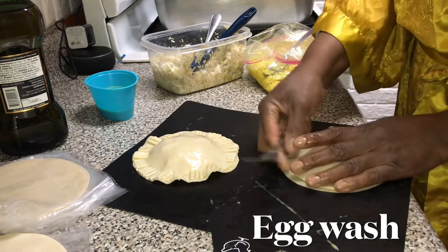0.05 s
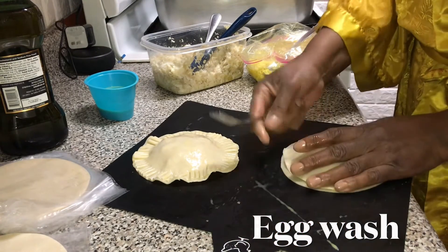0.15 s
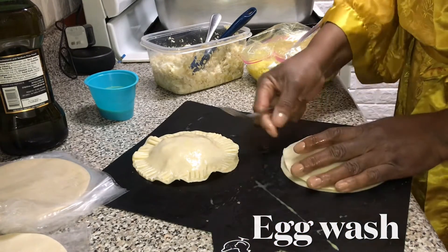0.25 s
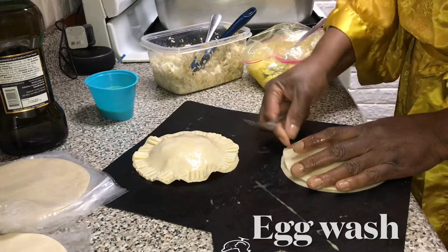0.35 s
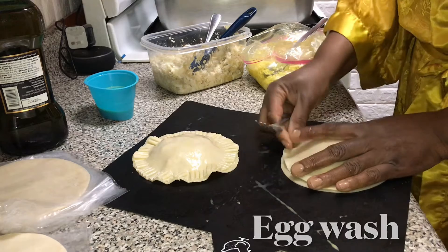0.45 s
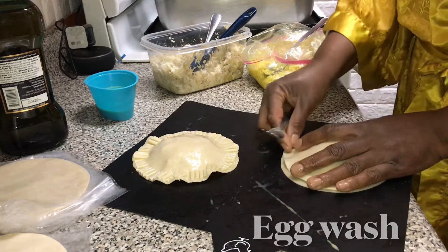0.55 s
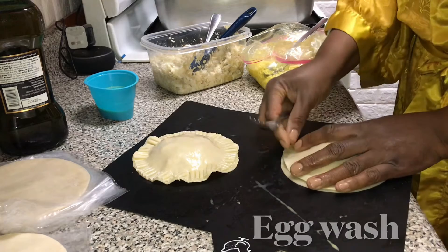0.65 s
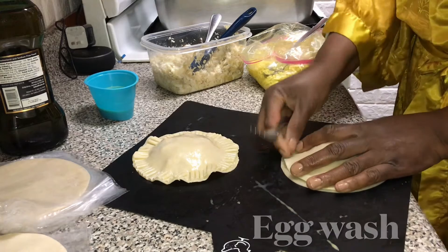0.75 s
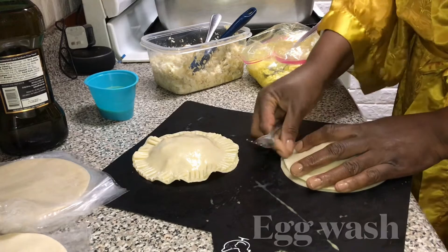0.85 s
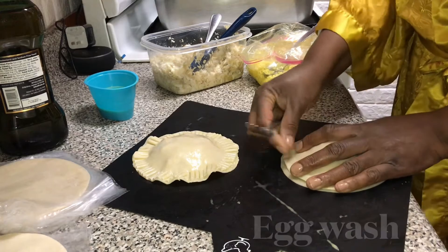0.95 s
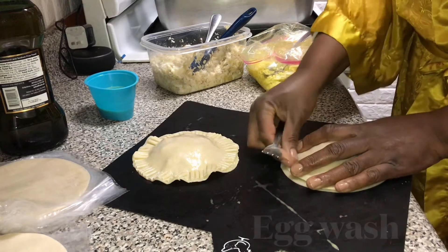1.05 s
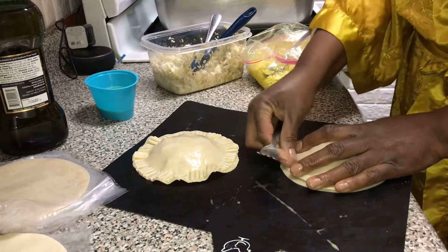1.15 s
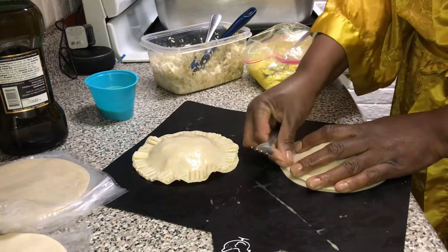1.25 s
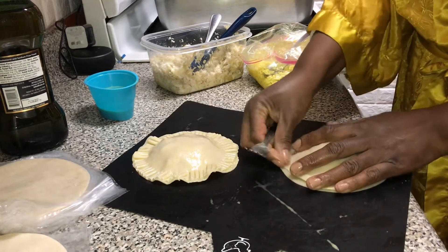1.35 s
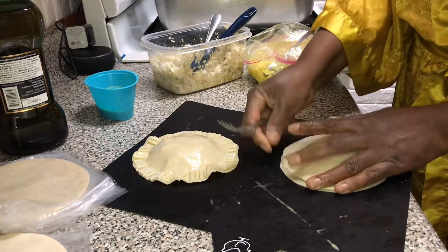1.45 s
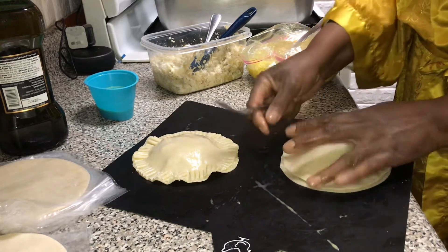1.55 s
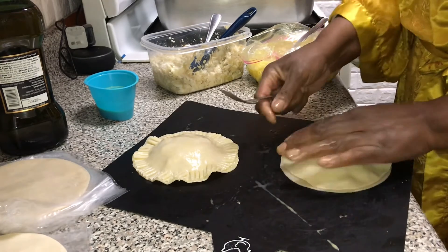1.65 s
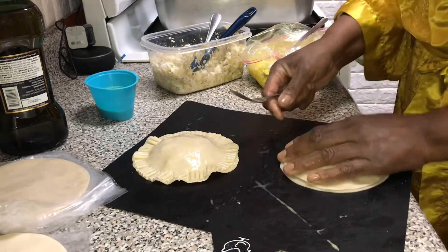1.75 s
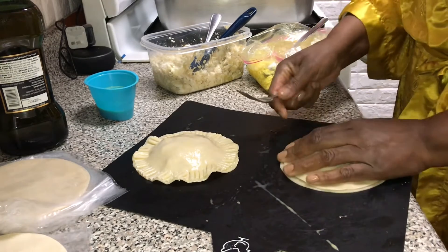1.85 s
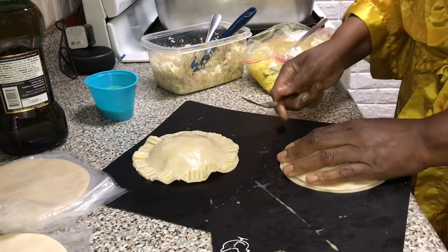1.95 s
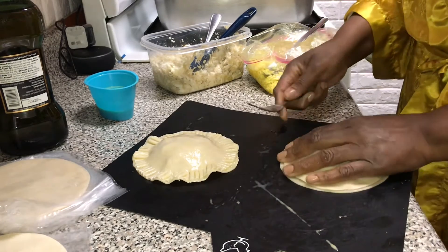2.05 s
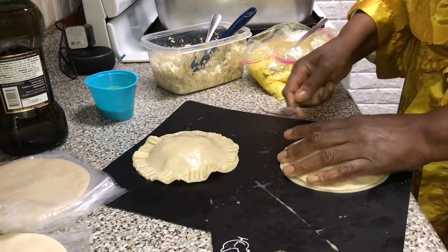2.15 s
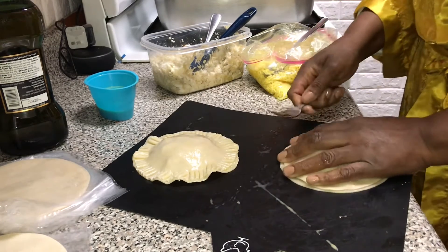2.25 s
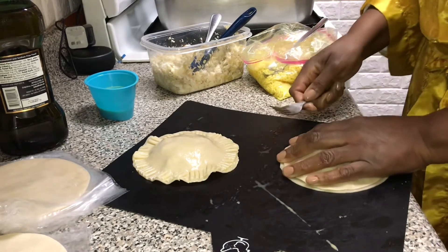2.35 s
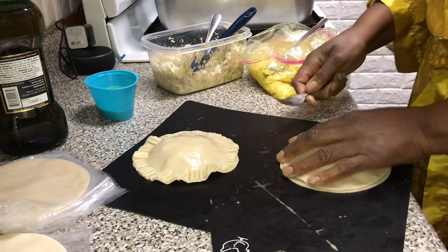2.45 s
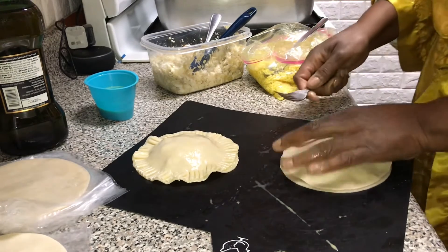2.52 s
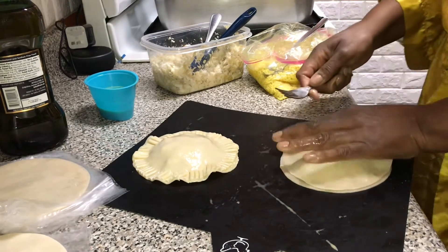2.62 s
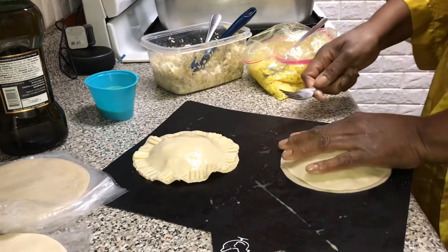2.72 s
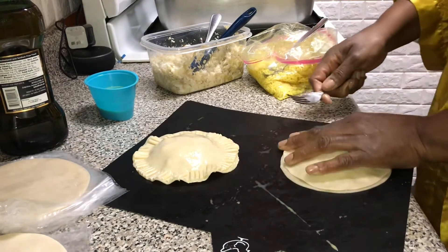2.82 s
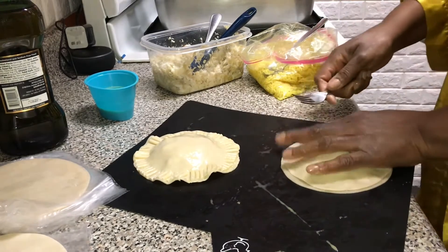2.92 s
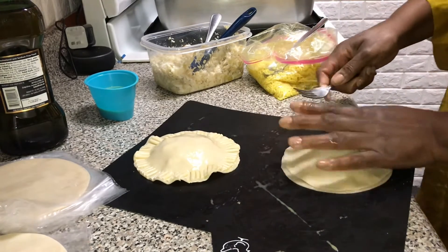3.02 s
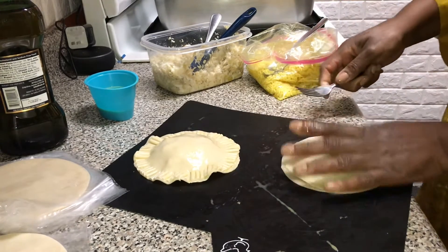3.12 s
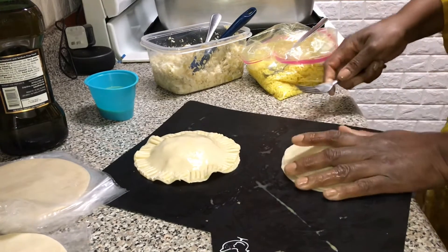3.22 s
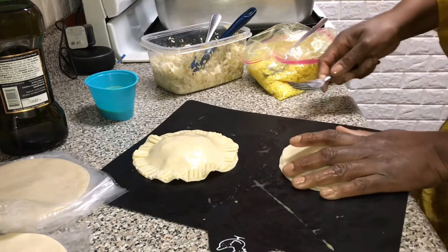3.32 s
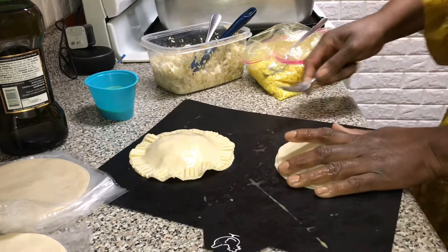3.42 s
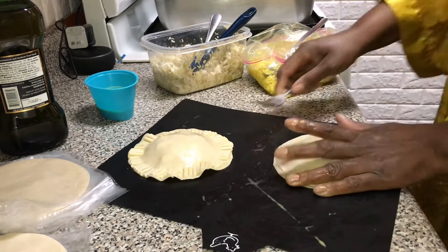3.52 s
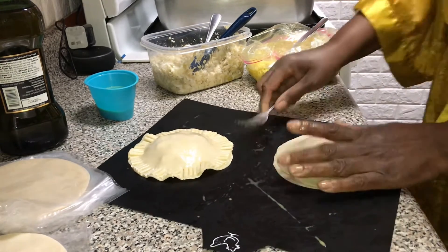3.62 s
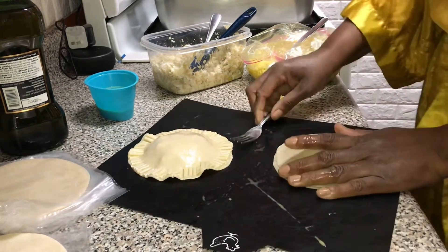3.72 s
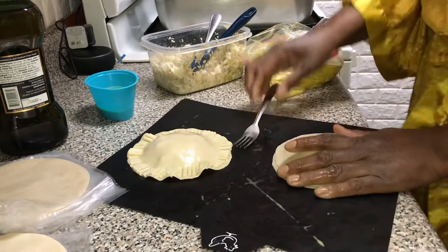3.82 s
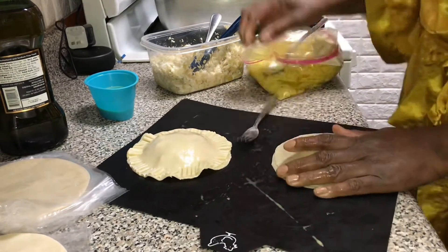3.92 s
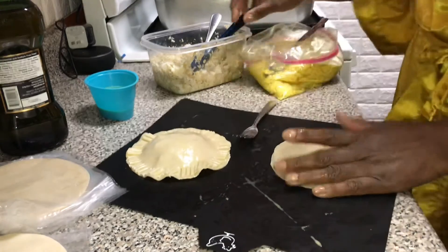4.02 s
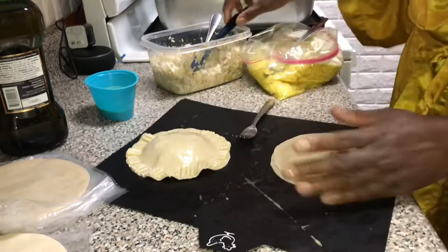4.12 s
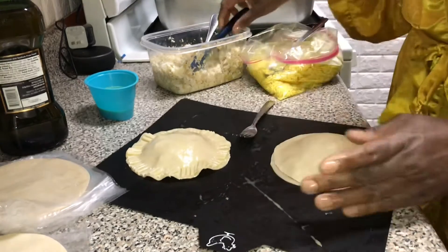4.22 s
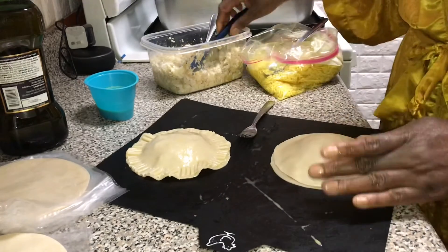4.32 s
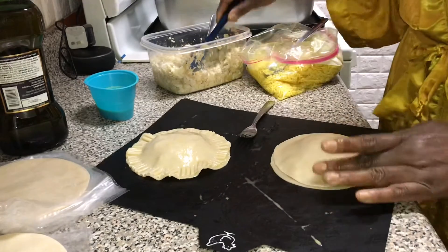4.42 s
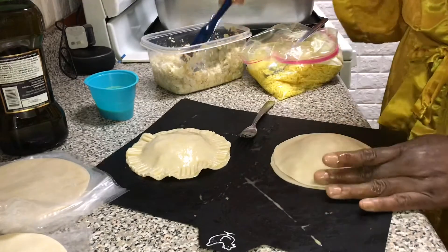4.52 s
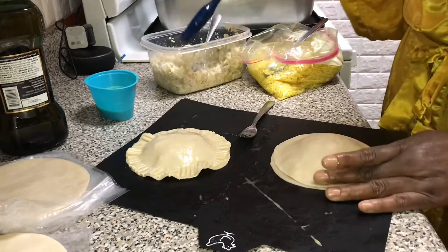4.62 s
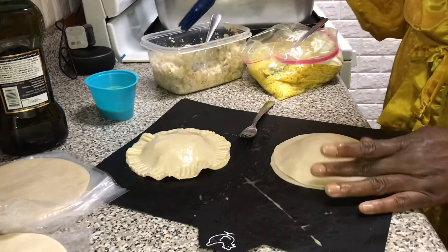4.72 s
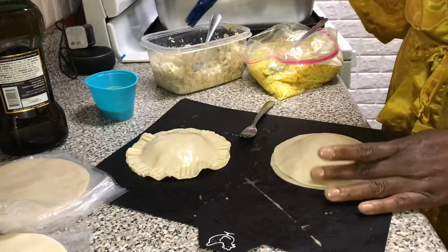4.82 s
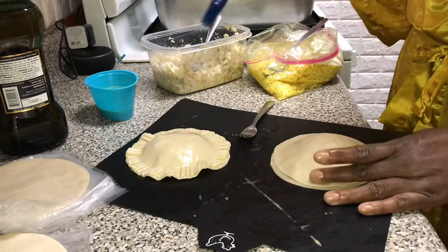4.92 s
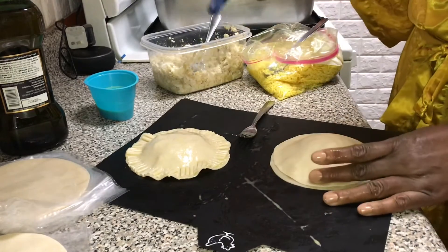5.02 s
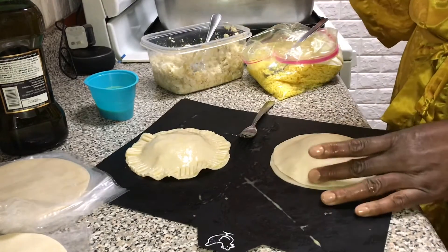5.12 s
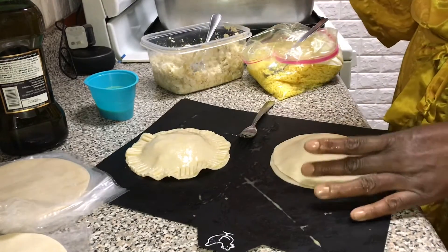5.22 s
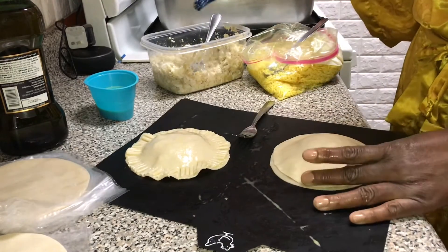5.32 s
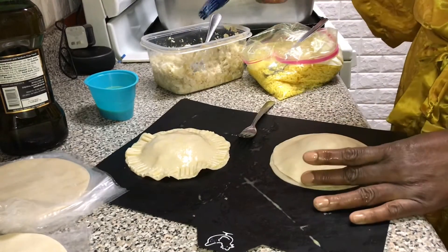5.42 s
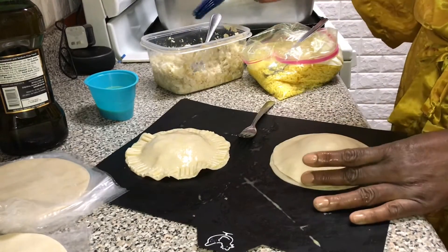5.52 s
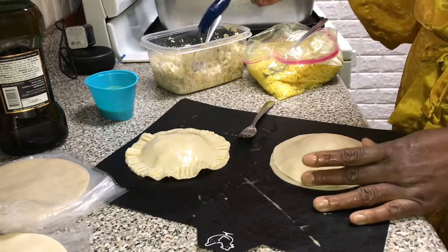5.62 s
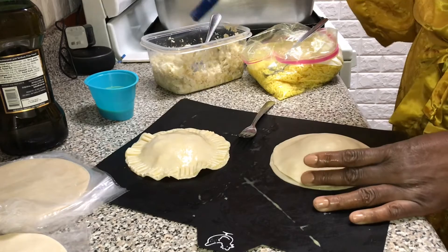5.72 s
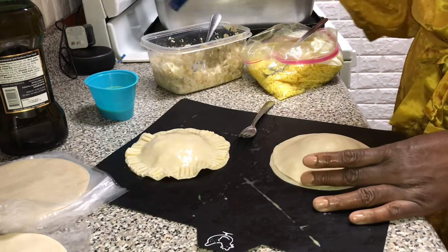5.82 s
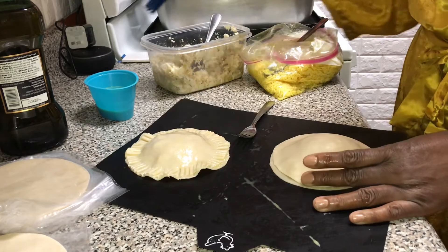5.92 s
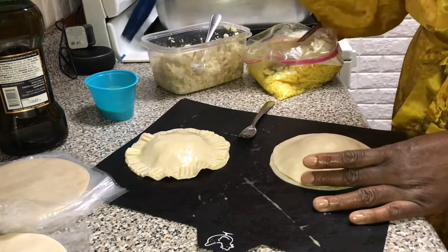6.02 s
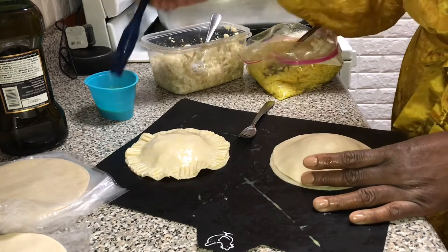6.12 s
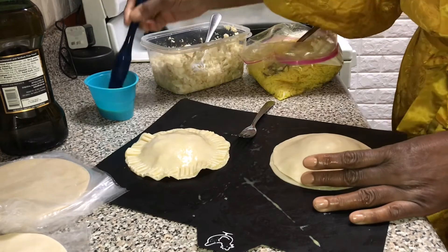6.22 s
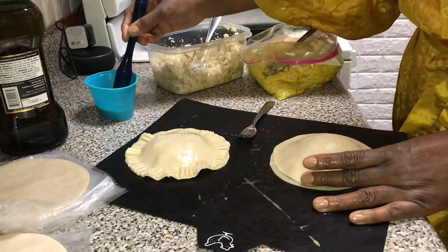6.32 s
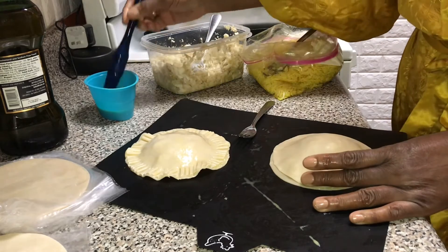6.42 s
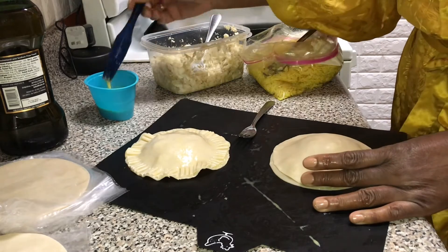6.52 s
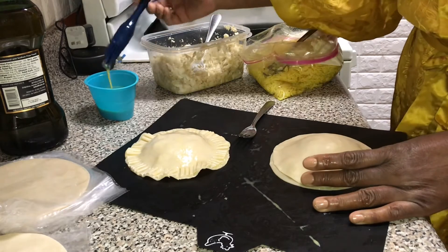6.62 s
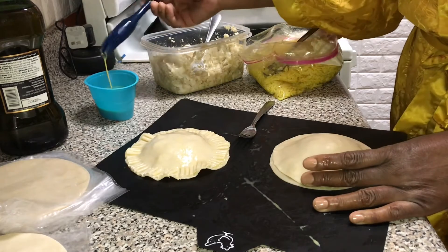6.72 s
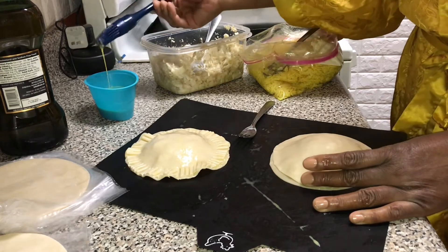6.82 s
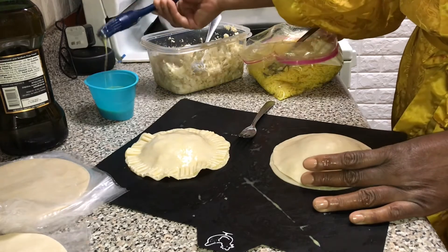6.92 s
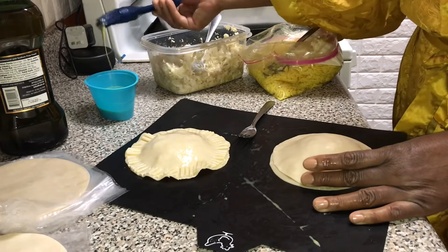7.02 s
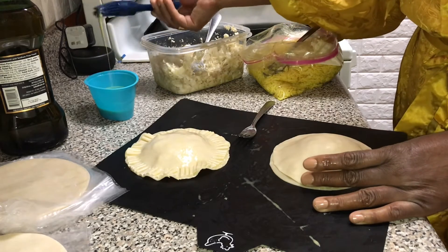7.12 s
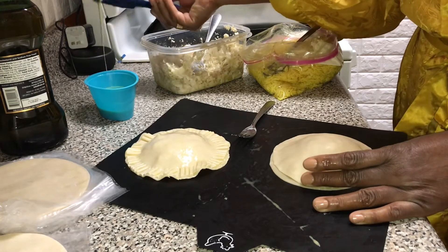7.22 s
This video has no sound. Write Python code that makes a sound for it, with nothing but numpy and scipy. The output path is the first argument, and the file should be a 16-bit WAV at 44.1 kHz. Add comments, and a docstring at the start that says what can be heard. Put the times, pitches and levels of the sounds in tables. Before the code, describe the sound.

Soft low thumps and faint taps of dough handling in a small kitchen, broken by one sharp metal fork clatter, then near quiet with tiny taps.

```python
"""A small kitchen with a stone counter, where a hand crimps and turns pastry on a plastic mat.
The hand is low thumps, light taps, sliding noise and sticky crackle. A steel fork is put down, then dropped:
it bounces, rattles and chatters with noise cracks and struck modes of mat and counter, and rings in decaying sines.
Short reflections follow the hard contacts, taps and fork ring, over a faint rumble and hiss."""
import sys
import numpy as np
from scipy import signal
from scipy.io import wavfile

SR = 44100
rng = np.random.default_rng(int(sys.argv[2]) if len(sys.argv) > 2 else 0)


def waveform_to_disk(signal):
    """Save audio, clipped to [-1, 1], as 16-bit WAV at the path in sys.argv[1]."""
    frames = np.transpose(np.atleast_2d(signal))
    scaled = np.clip(frames, -1, 1) * 32767
    samples = np.round(scaled).astype(np.int16)
    wavfile.write(sys.argv[1], SR, samples)


N = 319845

# The bounces of the dropped fork. Each row: time in seconds, crack level in dB, crack brightness in dB per octave,
# mat level in dB, counter thud level in dB, then ring level in dB near each of the upper three ring groups.
FORK_BOUNCES = [(3.921, 9, -1.4, -5.5, -7, -19, -8, -7.5),
                (4.014, 3.5, -2, -12.5, -19.5, -14.5, -17, -19.5),
                (4.083, 0.5, 0.8, -24, -15, -25, -13, -21.5),
                (4.137, -6, 1.5, -22, -19, -24.5, -22.5, -14.5),
                (4.172, -2, -2.9, -17, -29, -17.5, -27.5, -17),
                (4.222, -26.5, 4.5, -40, -51.5, -39, -36.5, -26)]
# The mat's own modes. Each row: frequency in Hz, relative level in dB, t60 in seconds.
MAT_MODES = [(628, -6.5, 0.074), (695, -7, 0.041), (753, -7, 0.079), (879.6, -7.5, 0.057),
             (968.4, -5.5, 0.022), (1163, -5, 0.026), (1353, -7, 0.033), (1696, -6.5, 0.017),
             (2105, -5.5, 0.013), (2720, -19, 0.017), (3602, -11.5, 0.01)]


def from_db(db):
    """Turn decibels into an amplitude factor."""
    return 10 ** (np.asarray(db) / 20)


def rms_one(x):
    """Scale a signal to an rms of 1."""
    return x / np.sqrt(np.mean(x ** 2) + 1e-20)


def at_hz(points, hz):
    """Read a curve of (Hz, value) points, straight between them on a log frequency axis."""
    points = np.array(points)
    return np.interp(np.log(hz), np.log(points[:, 0]), points[:, 1])


def drift(rate_hz):
    """Slow random wandering with spread 1: low-passed noise made at a fortieth of the sample rate."""
    step = 40
    pole = np.exp(-2 * np.pi * rate_hz * step / SR)
    noise = rng.standard_normal(N // step + 2002)
    slow = signal.lfilter([1], [1, -2 * pole, pole * pole], noise)[2000:]  # skip the filter's start
    return np.interp(np.arange(N) / step, np.arange(len(slow)), rms_one(slow))


def noise_bands(size):
    """Third-octave bands of white noise as (centre Hz, band); neighbours come from separate noises."""
    edges_hz = 31.25 * 2 ** np.arange(0, 9.4, 1 / 3)
    white = rng.standard_normal((2, size))
    for k, (low, high) in enumerate(zip(edges_hz, edges_hz[1:])):
        sos = signal.butter(3, [low, high], "band", fs=SR, output="sos")
        yield np.sqrt(low * high), signal.sosfilt(sos, white[k % 2])


def coloured(spectrum, patchy_db, rate_hz):
    """Noise of a given spectrum whose bands flicker, partly together and partly alone; rms 1."""
    together = drift(rate_hz)
    out = np.zeros(N)
    for hz, band in noise_bands(N):
        flicker_db = patchy_db * (together / 2 + drift(rate_hz))
        out += band * from_db(at_hz(spectrum, hz) + flicker_db)
    return rms_one(out)


def clicks(times, levels_db):
    """Single-sample impulses, the raw blows that excite the filters."""
    out = np.full(N, 1e-18)  # a tiny floor in place of silence
    np.add.at(out, (np.asarray(times) * SR).astype(int), from_db(levels_db))
    return out


def struck(times, levels_db, modes, scatter_db, bright=0):
    """Each blow rings every mode with a strength of its own; bright tilts them in dB per octave."""
    out = np.zeros(N)
    luck = rng.standard_normal((len(times), len(modes)))
    for k, (hz, mode_db, t60) in enumerate(modes):
        tilt_db = bright * np.log2(hz / 1500)
        blows = clicks(times, levels_db + mode_db + scatter_db * luck[:, k] + tilt_db)
        r = from_db(-60 / (t60 * SR))  # decay per sample
        w = 2 * np.pi * hz / SR
        sign = (-1) ** k  # modes alternate in polarity
        out += sign * signal.lfilter([0, np.sin(w)], [1, -2 * r * np.cos(w), r * r], blows)
    return out


def cracks(times, crack_db, bright, rise_s):
    """Bursts of noise that swell over rise_s and die away at a rate of their own in each band."""
    # The crack's spectrum. Each row: frequency in Hz, relative density in dB per Hz.
    spectrum = [(200, -40), (350, -10.5), (1200, -3), (1600, -10), (2100, -3.5), (3000, -9), (3700, -6.5),
                (5600, -12.5), (6600, -20), (10000, -19.5), (16000, -29.5)]
    # The crack's decay. Each row: frequency in Hz, t60 in seconds.
    decay = [(400, 0.024), (1500, 0.023), (5000, 0.027), (14000, 0.0071)]
    out = np.zeros(N)
    soft = np.exp(-1 / (rise_s * SR))
    for hz, band in noise_bands(N):
        level_db = crack_db + at_hz(spectrum, hz) + bright * np.log2(hz / 1500) + 8.0
        fade = from_db(-60 / (at_hz(decay, hz) * SR))
        dying = signal.lfilter([1], [1, -fade], clicks(times, level_db))
        out += band * signal.lfilter([1 - soft], [1, -soft], dying)
    return out


def presses():
    """Fingers press the dough: short low modes whose pitch follows the place pressed, the contact rounded."""
    # The presses. Each row: time in seconds, thump frequency in Hz, thump level in dB, deep level in dB.
    press_rows = [(.752, 138, -23.5, -22), (1.009, 166.2, -21.5, -29.5), (1.709, 120, -45, -32),
                  (2.634, 105, -29, -22.5), (2.762, 140, -34.5, -58), (3.15, 155.7, -20.5, -22),
                  (3.647, 109, -29.5, -27), (4.491, 115, -36.5, -33.5), (5.101, 119, -30.5, -45),
                  (5.7, 106, -29.5, -40), (6.74, 147, -36.5, -44)]
    # Modes of mat and dough, damped by the hand. Each row: multiple of the thump frequency, level in dB,
    # t60 in seconds.
    thump_modes = [(1, 0, 0.11), (1.55, -8, 0.18), (2.1, -7, 0.039)]
    # The counter as a whole. Each row: frequency in Hz, level in dB, t60 in seconds.
    deep_modes = [(78.6, 0.5, 0.16)]
    # Higher modes under a press. Each row: frequency in Hz, level in dB, t60 in seconds.
    knock_modes = [(582, -7.5, 0.146), (697, -5.5, 0.047), (819, -8.5, 0.1)]
    knock_against_thump_db = -13

    times, thump_hz, thump_db, deep_db = np.transpose(press_rows)
    thumps = struck(times, deep_db, deep_modes, scatter_db=0.0)
    for at, base_hz, level_db in zip(times, thump_hz, thump_db):
        modes = [(base_hz * multiple, mode_db, t60) for multiple, mode_db, t60 in thump_modes]
        thumps += struck([at], level_db, modes, scatter_db=2.5)
    knocks = struck(times, thump_db + knock_against_thump_db, knock_modes, scatter_db=4.0)
    rounded_thumps = signal.sosfilt(signal.butter(2, 330, fs=SR, output="sos"), thumps)
    rounded_knocks = signal.sosfilt(signal.butter(2, 1000, fs=SR, output="sos"), knocks)
    return rounded_thumps + rounded_knocks


def taps():
    """Light touches, a short high hiss and dough crackle: slow-rising cracks that barely ring the mat."""
    # Light touches on the mat; the two very bright rows near 2.93 s make a short high hiss.
    # Each row: time in seconds, crack level in dB, brightness in dB per octave.
    tap_rows = [(0.06, -43, -4), (0.478, -45, -9.5), (0.604, -41, -4.5), (0.752, -36.5, -7.5),
                (0.844, -46, -5), (0.993, -40, -2), (1.011, -38.5, -5), (1.169, -41.5, -3), (1.33, -43, -3),
                (1.381, -44.5, -6.5), (1.425, -39.5, -6), (1.516, -39, -5), (1.532, -51, -3),
                (1.703, -40.5, -1), (1.714, -41, -1), (1.987, -38, 1), (2.007, -31.5, -3.5),
                (2.418, -42, -2), (2.477, -44, -3), (2.632, -36.5, -2), (2.909, -39, -5.5),
                (2.929, -53.5, 11), (2.943, -59, 11.5), (3.084, -34.5, -2.5), (3.138, -32, -1),
                (3.228, -39.5, 3), (3.508, -35, -4.5), (3.642, -34.5, -2), (4.491, -47, -1),
                (4.818, -45, -5), (4.92, -42, 0), (5.578, -45, -0.5), (6.979, -47, -1.5)]
    mat_against_crack_db = -10.5
    times, crack_db, bright = np.transpose(list(tap_rows) + crackle())
    mat = struck(times, crack_db + mat_against_crack_db, MAT_MODES, scatter_db=1.0, bright=bright)
    return cracks(times, crack_db, bright, rise_s=0.004) + mat


def crackle():
    """Sticky dough lets go in tiny random snaps whose level follows the strokes, as rows like the taps."""
    snaps_per_s, bright = 30, -0.5  # brightness in dB per octave
    over_stroke_db, scatter_db = 6.5, 3.5
    at = np.flatnonzero(rng.random(N) < snaps_per_s / SR)
    levels_db = stroke_db()[at] + over_stroke_db + scatter_db * rng.standard_normal(len(at))
    return [(i / SR, level_db, bright) for i, level_db in zip(at, levels_db)]


def slides():
    """Dough, hand and sleeve slide: grainy friction noise under each stroke."""
    # The friction spectrum. Each row: frequency in Hz, relative density in dB per Hz.
    friction = [(400, -2), (800, -5), (1200, -4.5), (1900, 1.5), (3000, -3.5), (5500, -3.5), (6400, -14.5),
                (14000, -19), (16000, -26)]
    grain_db = 1.2 * drift(60)
    return from_db(stroke_db() + grain_db) * coloured(friction, patchy_db=0.6, rate_hz=60)


def stroke_db():
    """Level in dB of the loudest stroke at each moment; all rise and fall at the same rates around their hold."""
    # The strokes. Each row: start of the hold in seconds, hold in seconds, level in dB.
    strokes = [(0.447, 0.018, -60), (1.40, .14, -67.5), (2.002, 0.06, -51.5), (2.088, 0.17, -51),
               (2.47, 0.042, -60), (2.9, 0.038, -61.5), (3.056, 0.11, -56.5), (3.197, 0.059, -57),
               (3.423, .11, -59.5), (3.662, 0.045, -56), (6.99, .03, -63.5)]
    rise, fall = 220, 310  # dB per second
    t = np.arange(N) / SR
    levels_db = []
    for start, hold, level_db in strokes:
        before, after = np.maximum(start - t, 0), np.maximum(t - start - hold, 0)
        levels_db.append(level_db - rise * before - fall * after)
    return np.max(levels_db, axis=0)


def hard_contacts():
    """Fork and ticks on the mat: a sharp crack, the mat's short ring and the counter's thud."""
    # The counter's modes. Each row: frequency in Hz, relative level in dB, t60 in seconds.
    counter_modes = [(78, -5.5, 0.17), (119, -3.5, 0.091), (201, 0, .24), (264, -5.5, .18),
                     (333.5, -14, 0.12), (435, -13, 0.14)]
    bounces = [row[:5] for row in FORK_BOUNCES]
    rows = set_down() + rattle() + ticks() + chatter() + bounces
    times, crack_db, bright, mat_db, thud_db = np.transpose(rows)
    mat = struck(times, mat_db, MAT_MODES, scatter_db=1.5, bright=-1.7)
    thud = struck(times, thud_db, counter_modes, scatter_db=2.5)
    return cracks(times, crack_db, bright, rise_s=0.00028) + mat + thud


def contact_rows(blows, bright, thud_against_mat_db):
    """Complete blows to rows of (s, crack dB, brightness in dB per octave, mat dB, thud dB)."""
    return [(s, crack_db, bright, mat_db, mat_db + thud_against_mat_db) for s, crack_db, mat_db in blows]


def set_down():
    """The fork is put down, still in the fingers: a few dull contacts."""
    # Each row: time in seconds, crack level in dB, mat level in dB.
    blows = [(3.683, -17.5, -13), (3.71, -25, -17), (3.722, -29, -30)]
    return contact_rows(blows, bright=-3.5, thud_against_mat_db=-7)


def rattle():
    """The dropped fork rattles around and between its bounces: lesser contacts in quick succession."""
    # Each row: time in seconds, crack level in dB, mat level in dB.
    blows = [(3.898, -41, -48), (3.927, -10.5, -17.5), (3.939, -14, -22), (3.968, -17, -20),
             (3.977, -11, -11), (3.988, -22, -15.5), (4.023, -4.5, -30.5), (4.041, -19, -17),
             (4.058, -21, -18.5), (4.102, -18, -19), (4.125, -27, -19), (4.192, -6.5, -22),
             (4.203, -19, -29), (4.212, -12.5, -41)]
    return contact_rows(blows, bright=-1.7, thud_against_mat_db=-4)


def chatter():
    """The tines buzz on the mat: dense faint random touches from first bounce to last, fading as they go."""
    touches_per_s, fade, bright = 220, 24, 3.8  # fade in dB per second, brightness in dB per octave
    top_db, spread_db = -26, 9.0  # strongest touch at the first bounce; range of strengths
    mat_against_crack_db, thud_against_crack_db = -11, -23.5
    start, stop = FORK_BOUNCES[0][0], FORK_BOUNCES[-1][0]
    luck = rng.random((int(touches_per_s * (stop - start)), 2))
    times = start + (stop - start) * luck[:, 0]
    levels_db = top_db - fade * (times - start) - spread_db * luck[:, 1]
    return [(at, db, bright, db + mat_against_crack_db, db + thud_against_crack_db)
            for at, db in zip(times, levels_db)]


def fork_ring():
    """Each bounce stops the ringing and sets new levels; decaying sines waver as the fork rocks."""
    # The frequencies of the fork's modes in Hz.
    mode_hz = [1103, 2313, 4212, 5905, 7716, 9932, 10120, 11350, 12280, 12420, 13660, 14965, 15355]
    # The same modes in order. Each row: relative level in dB, free t60 in seconds.
    fork_modes = [(-2.9, 0.8), (-1.26, 0.9), (-2.5, 0.3), (-9.5, .35), (0, 0.26), (-8, 0.12), (-19, 0.15),
                  (-21, 0.26), (-14, .15), (-14.5, .15), (-19, .2), (-1.5, .15), (-15, 0.11)]
    # The centres in Hz of the four ring groups between which the ring level is read.
    group_hz = [2320, 4200, 7700, 15000]
    # The low mode that the fingers leave ringing: time in seconds, frequency in Hz, level in dB, t60 in seconds.
    held_s, held_hz, held_db, held_t60 = (3.71, 1055, -29, 0.27)
    low_group_db = -41  # the lowest group gets the same level after every bounce
    lying_share = 0.49  # share of the free t60 once the fork lies on the mat
    weak_db, weak_scatter_db = -3, 3.5  # modes below weak_db vary from bounce to bounce
    rocking_db = 2.2

    out = struck([held_s], held_db, [(held_hz, 0, held_t60)], scatter_db=0.5)
    starts = [row[0] for row in FORK_BOUNCES]
    stops = starts[1:] + [starts[-1] + 0.5]
    rocking = [drift(45) for _ in mode_hz]
    for row, start, stop in zip(FORK_BOUNCES, starts, stops):
        share = lying_share if row is FORK_BOUNCES[-1] else 1
        at = int(start * SR)
        t = np.arange(int((stop - start) * SR)) / SR
        # the ring is heard a few ms after each loud blow, which overloads the recorder
        heard = 1 - np.exp(-t / 0.005)
        cut = np.clip((t[-1] - t) / 0.00082, 0, 1)  # quick stop at the next bounce
        groups = list(zip(group_hz, [low_group_db, *row[5:]]))
        phases = rng.uniform(0, 2 * np.pi, len(fork_modes))
        for hz, (mode_db, t60), phase, rock in zip(mode_hz, fork_modes, phases, rocking):
            level_db = at_hz(groups, hz) + mode_db - 60 * t / (t60 * share)
            scatter_db = weak_scatter_db * rng.standard_normal() * (mode_db < weak_db)
            waver_db = rocking_db * rock[at:at + len(t)] + scatter_db
            sine = np.sin(2 * np.pi * hz * t + phase)
            out[at:at + len(t)] += from_db(level_db + waver_db) * heard * cut * sine
    return out


def ticks():
    """A nail or a brush handle touches the mat: harder, brighter contacts."""
    # Each row: time in seconds, crack level in dB, mat level in dB.
    blows = [(3.147, -40, -46), (5.25, -39.5, -39), (5.692, -35.5, -33.5)]
    return contact_rows(blows, bright=5.2, thud_against_mat_db=-5)


def kitchen(x):
    """Dense reflections of the room: a noise tail whose bands each die at their own rate."""
    # The room's decay. Each row: frequency in Hz, t60 in seconds.
    decay = [(200, 0.11), (1000, .2), (5000, 0.18), (14000, 0.074)]
    t = np.arange(SR // 2) / SR
    tail = sum(band * from_db(-60 * t / at_hz(decay, hz)) for hz, band in noise_bands(len(t)))
    tail *= np.clip(t / 0.0085, 0, 1)  # the reflections build up over 8.5 ms
    unit_energy_tail = tail / np.sqrt(np.sum(tail ** 2))
    return from_db(-12.5) * signal.fftconvolve(x, unit_energy_tail)[:N]


def room_rumble():
    """The room rumbles faintly: low noise with slowly flickering bands."""
    # The rumble's spectrum. Each row: frequency in Hz, relative density in dB per Hz.
    spectrum = [(15, -68), (25, -44), (57, -4), (76, 0), (96, -2), (130, -0.5), (205, -8), (234, -17),
                (262, -11.5), (392, -14.5), (543, -31.5), (1020, -30.5), (1200, -40.5), (1560, -61),
                (2640, -120)]
    return from_db(-43.5) * coloured(spectrum, patchy_db=2.5, rate_hz=11)


def hiss():
    """A faint, nearly steady bed of broad noise."""
    # The hiss spectrum. Each row: frequency in Hz, relative density in dB per Hz.
    spectrum = [(600, -7.5), (1000, -6), (1600, -2), (5500, -6.5), (6500, -7.5), (13000, -10),
                (15500, -14.5)]
    return from_db(-63) * coloured(spectrum, patchy_db=0.3, rate_hz=12)


def scene():
    """Hard contacts, taps and fork ring excite the room; presses, slides and the background stay dry."""
    near = hard_contacts() + taps() + fork_ring()
    mix = near + kitchen(near) + presses() + slides() + room_rumble() + hiss()
    return mix[None]  # one channel


def record(dry):
    """The microphone loses the deepest bass, peaks beyond full scale clip and the top is cut."""
    low_cut_hz, top_cut_hz = 58, 16200
    thinned = signal.sosfilt(signal.butter(4, low_cut_hz, "high", fs=SR, output="sos"), dry)
    clipped = np.clip(thinned, -1, 1)
    top_cut = signal.cheby2(18, 60, top_cut_hz, fs=SR, output="sos")
    return np.clip(signal.sosfilt(top_cut, clipped), -1, 1)


dry = scene()
out = record(dry)
waveform_to_disk(out)
```